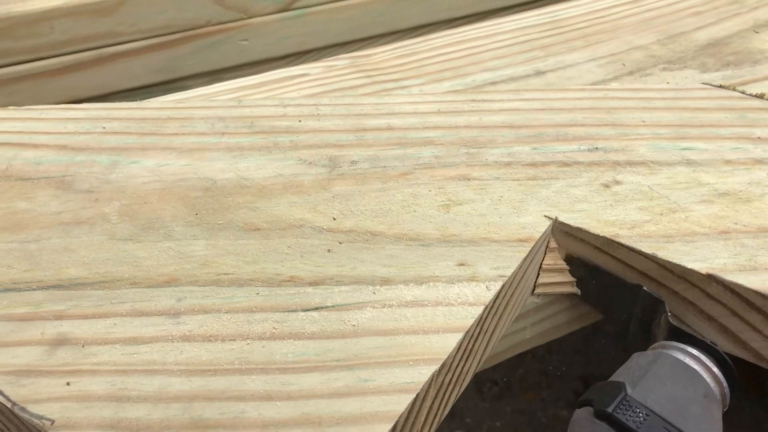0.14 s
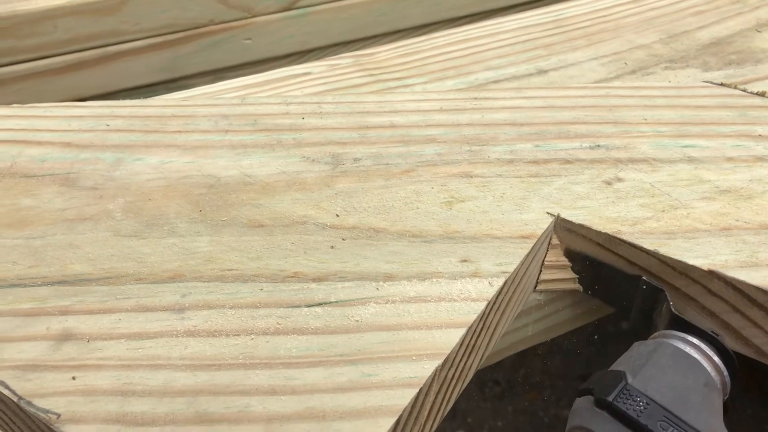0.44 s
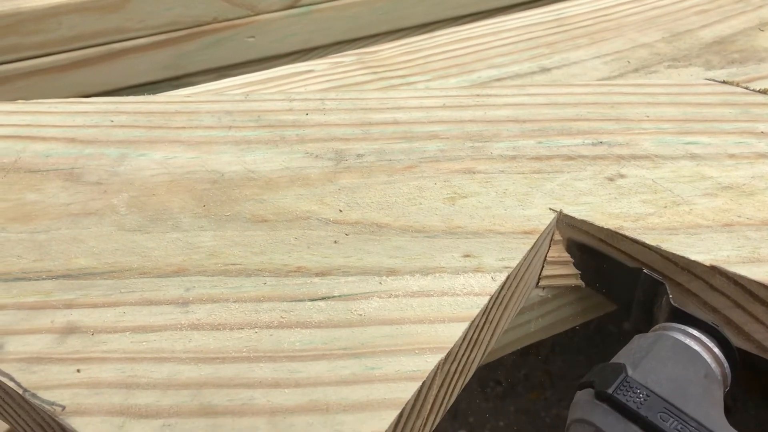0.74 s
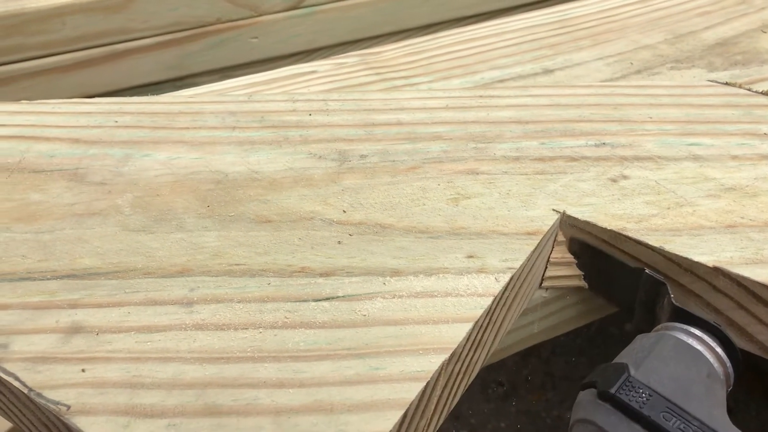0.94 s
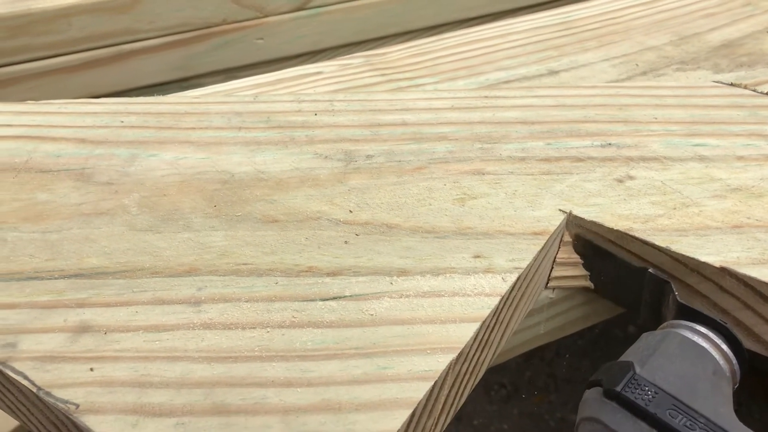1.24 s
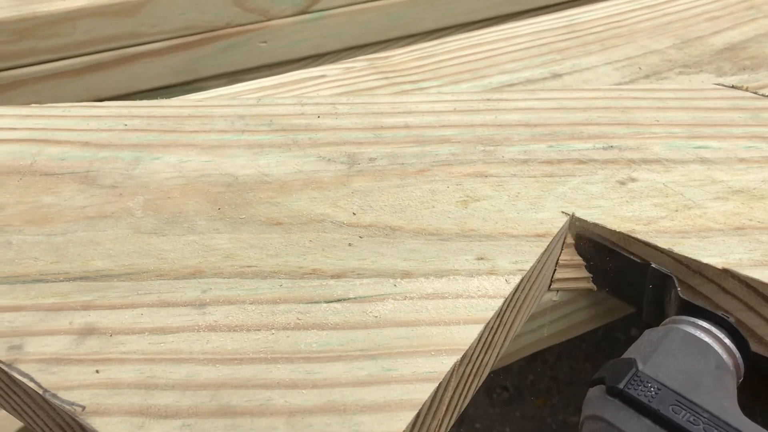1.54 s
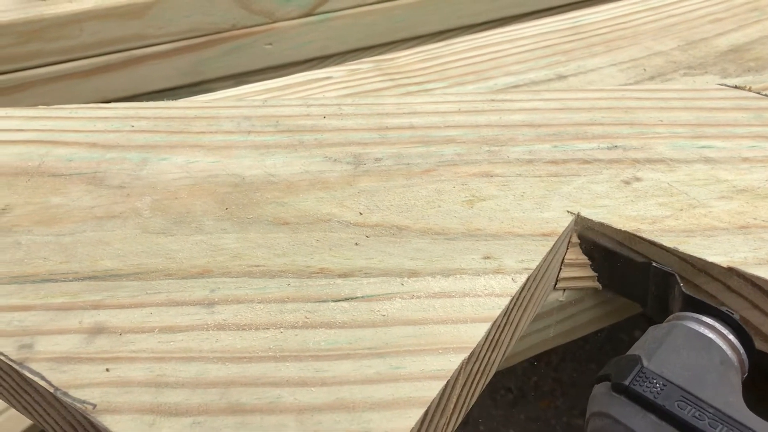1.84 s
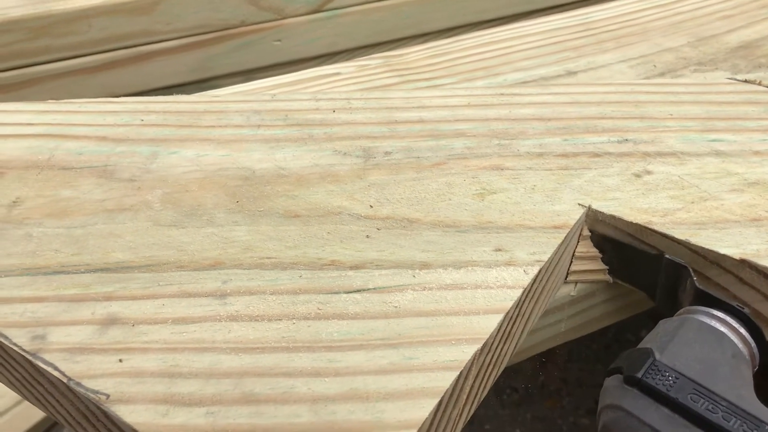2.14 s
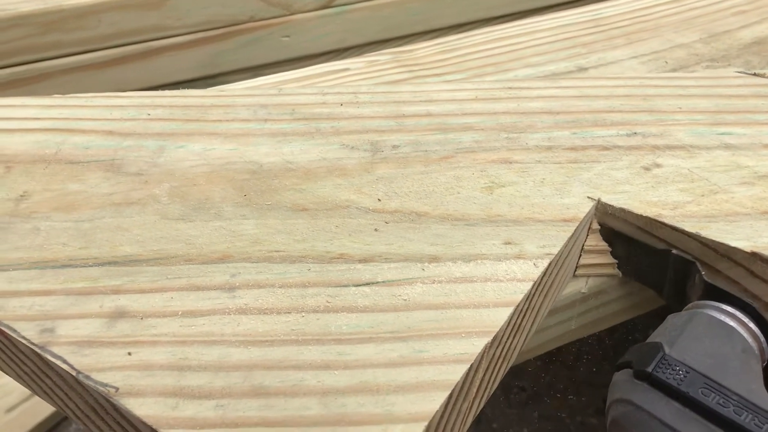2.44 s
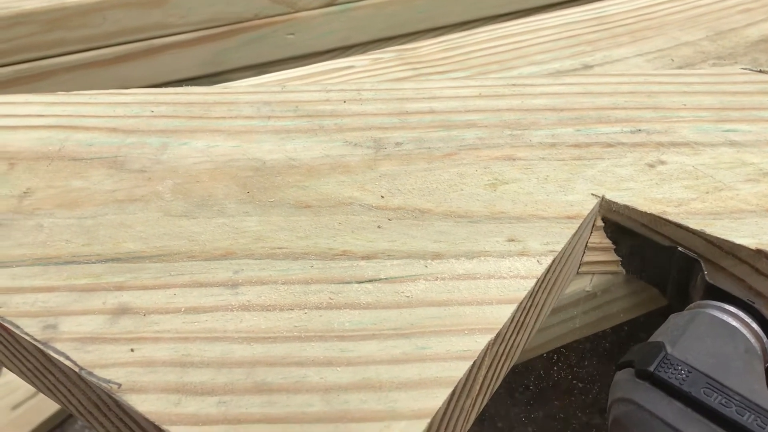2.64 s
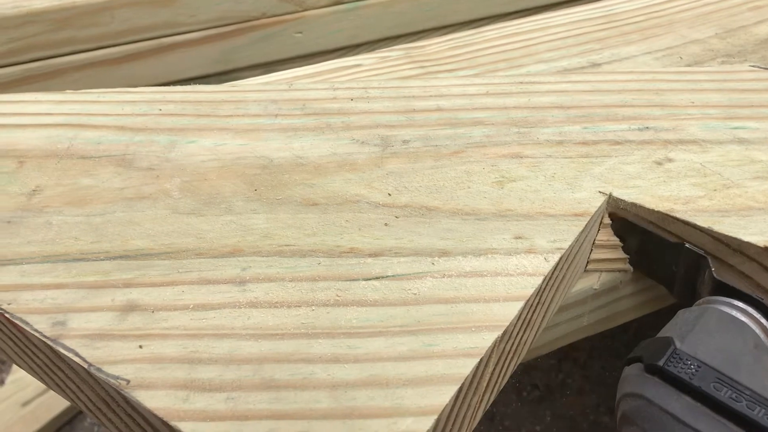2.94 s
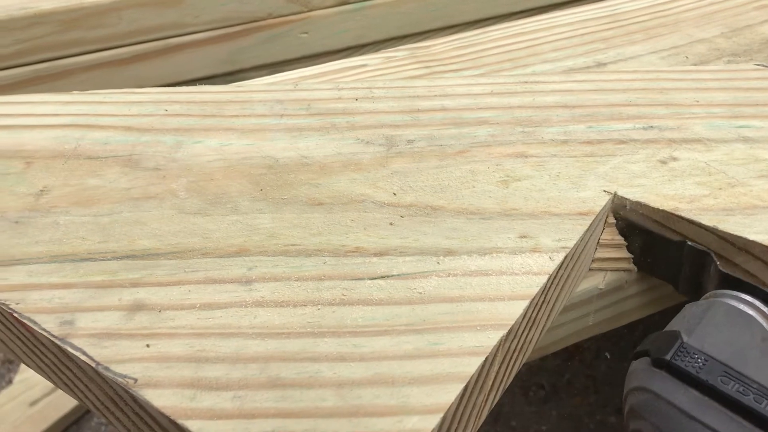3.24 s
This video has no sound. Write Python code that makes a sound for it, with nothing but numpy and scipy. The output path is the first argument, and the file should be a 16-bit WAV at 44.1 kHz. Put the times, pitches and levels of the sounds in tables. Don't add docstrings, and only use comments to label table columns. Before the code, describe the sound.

Harsh buzzing saw tool cutting a board, pitch sagging twice, nearly stalling before springing back

```python
import sys
import numpy as np
from scipy import signal
from scipy.fft import rfft, irfft
from scipy.io import wavfile
from scipy.ndimage import uniform_filter1d

SR = 44100
rng = np.random.default_rng(int(sys.argv[2]) if len(sys.argv) > 2 else 0)


def elevation(decibels):
    levels = np.asarray(decibels, float)
    return 10 ** (levels / 20)


def inscribe(sig):
    pcm = np.round(np.clip(np.atleast_2d(sig).T, -1, 1) * 32767)
    wavfile.write(sys.argv[1], SR, pcm.astype(np.int16))


N = 149940
T = np.arange(N) / SR


def curve(table, col):
    rows = np.array(table)
    return uniform_filter1d(np.interp(T, rows[:, 0], rows[:, col]), size=900, mode="nearest")


def bumps(rows):
    return sum(db * np.exp(-((T - s) / length) ** 2) for s, length, db in rows)


def colour(x, points, db):
    hz = np.maximum(np.arange(N // 2 + 1) * SR / N, 1)
    p = np.array(points)
    tilt_db = np.interp(np.log(hz), np.log(p[:, 0]), p[:, 1], left=-70)
    y = irfft(rfft(x) * elevation(tilt_db), N)
    return y * elevation(db) / np.sqrt(np.mean(y ** 2))


def walk(rate):
    k = int(SR / rate)
    steps = np.repeat(rng.standard_normal(400), k)[:N]
    w = uniform_filter1d(uniform_filter1d(steps, k), k)
    return w / w.std()


# (time [s], swing rate [Hz])
SPEED = [(0, 273.8), (.35, 269.1), (.97, 270.7), (1.005, 254), (1.06, 244.2), (1.18, 236.8), (1.25, 240.8),
         (1.31, 269.2), (1.8, 272.8), (2.17, 270.7), (2.23, 254.4), (2.47, 241.5), (2.57, 231.7),
         (2.71, 224.2), (2.96, 171), (3.06, 165.8), (3.12, 185.1), (3.21, 272.3)]


def swing_rate():
    return curve(SPEED, 1)


# (time [s], level [dB], bite steadiness [dB], wood rasp [dB], likeness of stroke ends [dB])
CONTACT = [(0, 1, -1, -9, -13), (.19, 2, -4, -3.5, -10), (.26, 0, -3, 3, 8), (.55, 1, -1, -8.5, -4),
           (.62, 1, -3.5, 0.5, -7.5), (.97, -0.5, 1.5, -7, -5.5), (1.05, -0.5, 1, -3.5, -3.5),
           (1.24, 1, 0, -5.5, -0.5), (1.34, 0.5, 1, -3.5, 1.5), (1.56, 0, 2, -11, 4),
           (1.66, 0.5, -1.5, 0.5, 6.5), (2.18, 0, -4.5, 3.5, 4), (2.3, 1.5, 1, 0, -7),
           (2.75, 0, -1, -4.5, 7.5), (2.92, -5.5, -5, 0, 1), (3.11, -2, -1, -4, 4.5),
           (3.175, 5, -0.5, 0.5, 4.5), (3.32, 0.5, -3, 4, -4)]


def contact(col):
    return curve(CONTACT, col)


# (time [s], length [s], gain [dB])
CATCHES = [
    (.15, 0.037, 2),
    (.99, 0.022, 2.5),
    (1.125, 0.015, 6),
    (1.285, 0.036, 5),
    (1.53, 0.021, 0),
    (2.13, .02, 7),
    (2.38, 0.032, 3.5),
    (3.18, 0.0068, 4.5),
]


def catches():
    return bumps(CATCHES)


def depth():
    return np.clip((T - 1.18) / 0.15, 0, 1)


# (time [s], length [s], centre [Hz], width [Hz], gain [dB])
RESONANCES = [(0.11, 0.12, 1260, 82, 3), (.12, .1, 2950, 350, 3.5), (.07, 0.073, 2170, 170, -14),
              (0.13, 0.15, 5450, 300, -3), (0.365, 0.081, 1450, 400, -15), (0.31, 0.043, 2950, 450, -5),
              (0.61, 0.077, 1800, 300, -1.5), (0.43, 0.13, 2380, 230, 8), (0.68, .15, 1300, 400, 1.5),
              (.75, 0.23, 1770, 180, 3), (0.78, 0.19, 2700, 260, -6), (1.2, 0.074, 1400, 140, 4.5),
              (1.34, 0.071, 3730, 440, -5), (.995, 0.02, 3760, 1600, 5), (1.262, 0.03, 4500, 610, 5.5),
              (1.55, 0.043, 3620, 560, 4), (1.55, .05, 5330, 350, 4), (1.741, 0.19, 2450, 170, 9.5),
              (1.97, 0.28, 3800, 180, -6), (1.76, .12, 3530, 200, 4), (2.4, 0.15, 1720, 180, 6.5),
              (2.44, 0.15, 1064, 167, 5.5), (2.603, 0.084, 2250, 170, 14.5), (2.6, 0.06, 2100, 250, -4),
              (2, 0.062, 2900, 700, -9), (2.77, 0.049, 1680, 130, 10.5), (3.04, 0.035, 970, 870, -0.5),
              (3.125, 0.046, 1900, 1740, -5), (3.33, 0.11, 806, 140, -7), (2.91, 0.046, 1600, 1400, -5),
              (3.26, 0.052, 1330, 230, 5), (3.25, 0.049, 2080, 270, 5)]


def resonance(hz):
    t, f = T[::200], hz[::200]
    db = 0
    for s, length, mid_hz, width, gain_db in RESONANCES:
        db = db + gain_db * np.exp(-((t - s) / length) ** 2 - ((f - mid_hz) / width) ** 4)
    return np.interp(T, t, db)


# (multiple of swing rate, level [dB])
FREE = [(1, -19), (2, -17.5), (3, -3.5), (4, -10), (5, -10), (6, -3), (7, -4.5), (8, -10), (9, -12),
        (10, -10), (11, -9), (12, -8.5), (13, -5.5), (14, -1), (15, -6.5), (16, -5), (17, -3.5), (18, -17),
        (19, -18), (20, -3), (21, -19), (22, -9), (23, -11)]
# (multiple of swing rate, level [dB])
DEEP = [(1, -21), (2, -17), (3, -1.5), (4, -9), (5, -9), (6, -6), (7, -10), (8, -5), (9, -15.5), (10, -14),
        (11, -7), (12, -12), (13, -8), (14, -2), (15, -3.5), (16, -6), (17, -8), (18, -7), (19, -9),
        (20, -12), (21, -27), (22, -10.5), (23, -10.5)]
# (multiple of swing rate, level [dB])
LOADED = [(1, -20.5), (2, -14), (3, -8), (4, -8), (5, -4), (6, -6), (7, -9), (8, -10), (9, -11),
          (10, -14.5), (11, -15), (12, -31), (13, -10), (14, -20), (15, -12), (16, -8), (17, -10),
          (18, -8.5), (19, -8), (20, -15), (21, -29), (22, -24), (23, -8)]
# (multiple of swing rate, level [dB])
STALLED = [(1, -10), (2, -15), (3, -8.5), (4, -6), (5, 1.5), (6, 2.5), (7, 5), (8, -1), (9, 3), (10, 0),
           (11, 3.5), (12, -13), (13, -1), (14, -2.5), (15, -26.5), (16, 0.5), (17, -20), (18, -5),
           (19, -26), (20, -5), (21, -6), (22, -4), (23, -10)]
# (time [s], length [s], gain [dB])
STILLS = [
    (2.73, 0.051, -32),
    (3.07, 0.029, -26),
    (3.3, 0.098, -6),
]


def hum(turns, hz):
    free_hz, loaded_hz, stalled_hz = 270.6, 251.5, 178
    stall_from_hz = loaded_hz - 20
    load = np.clip((free_hz - hz) / (free_hz - loaded_hz), 0, 1)
    stall = np.clip((stall_from_hz - hz) / (stall_from_hz - stalled_hz), 0, 1)
    glide = np.abs(np.gradient(hz)) * SR
    slip = (.004 + 1e-5 * glide) * walk(80)
    alike, bite = contact(4), contact(2) + catches()
    still, deep = bumps(STILLS), depth()
    flutter_depth = 0.42 + 0.47 * load + 0.49 * stall
    out = 0
    for (k, shallow_db), (_, deep_db), (_, loaded_db), (_, stalled_db) in zip(FREE, DEEP, LOADED, STALLED):
        free_db = shallow_db + deep * (deep_db - shallow_db)
        db = free_db + load * (loaded_db - free_db) + stall * (stalled_db - loaded_db)
        db = db + bite * min((k - 1) / 4.5, 1.3)
        db = db + 1.8 * np.tanh(walk(10))
        db = db - flutter_depth * min(k / 3.8, 1) * 3.5 * walk(40) ** 2
        push = load * (np.arange(N) < 1.3 * SR) * (3 <= k <= 6)
        db = db + push * (-4.5 - 0.24 * bite.std() * walk(26.6))
        db = db + resonance(k * hz) + alike * (k == 2) + still * (k == 1)
        drift = 0.048 * k * rng.standard_normal() + 0.063 * walk(6.2)
        out = out + elevation(db) * np.sin(2 * np.pi * (k * (turns + slip) + drift))
    return out * elevation(-30) * np.sqrt(2)


def rasp(turns, points, db, both_db, one_db, grit_db, flicker_db):
    angle = 2 * np.pi * (turns + 0.088 * walk(5.25))
    gate_db = both_db * np.cos(2 * angle) + one_db * (1 + .5 * walk(3.92)) * np.cos(angle)
    size_db = np.minimum(grit_db * rng.exponential(size=N), 13)
    chips = rng.standard_normal(N) * elevation(gate_db + size_db)
    return colour(chips, points, db) * elevation(flicker_db * (walk(29.95) + walk(7.97)))


# (time [s], length [s], gain [dB])
HUSHES = [
    (.13, 0.091, -2),
    (.9, 0.083, 1.5),
    (1.06, 0.03, 0),
    (1.38, .015, -1.5),
    (1.52, 0.014, -4),
    (1.56, .03, 2.5),
    (3.04, .04, -0.5),
]


def hushes():
    return bumps(HUSHES)


# (frequency [Hz], density [dB per Hz])
WOOD = [(300, -33), (500, -19), (750, -16.5), (1100, -4.5), (1700, -6), (2600, -7.5), (3300, -6.5),
        (6000, -17.5)]


def wood_rasp(turns):
    return rasp(turns, WOOD, -30.5, 3., 2., 2.5, 1.2) * elevation(contact(3) - .6 * catches())


# (frequency [Hz], density [dB per Hz])
BLADE = [(1500, -4), (2700, -10), (4000, 0.5), (5500, -1.5), (7000, -7), (8800, -7), (10300, -15),
         (11500, -13)]


def blade_rasp(turns):
    return rasp(turns - .15, BLADE, -25, 1.7, 1.0, 2.7, 0.3) * elevation(-.4 * (contact(2) + catches()))


# (frequency [Hz], density [dB per Hz])
BOARD = [(120, -27), (250, -2.5), (400, -8), (600, -3), (800, 2), (1200, -20.5)]


def board_rasp(turns):
    return rasp(turns, BOARD, -51, 1., 1., 2., 1.5) * elevation(1.1 * contact(3) + 2 * hushes())


# (frequency [Hz], density [dB per Hz])
TEETH = [(9000, -65), (10500, -5), (11500, 3), (12600, 11), (13200, 4.5), (13800, 6), (15000, 0.5),
         (16500, -29.5)]


def teeth_hiss(turns):
    return rasp(turns - .25, TEETH, -29.5, 3.5, 1.6, 2.3, .9)


# (centre [Hz], width [Hz], level [dB], gain once deep [dB], gain once cut free [dB])
RINGS = [(4360, 750, -32.5, -2, 2), (5620, 530, -33.5, -4, -1), (8930, 1080, -35.5, 1, -3.5),
         (11970, 910, -42.5, 5, 4), (14350, 500, -33.5, -1, -1)]
# (time [s], length [s], ringing near [Hz], gain [dB])
SWELLS = [
    (0.124, 0.15, 5620, -5),
    (.6, 0.075, 5620, 2),
    (.85, 0.076, 5620, 4),
    (.42, .08, 4360, 0),
    (.9, 0.073, 4360, 2),
    (1.637, .04, 4360, 5),
    (2.4, 0.092, 4360, -9),
    (3.273, .03, 4360, 3),
]


def rings(turns):
    freed = np.clip((T - 3.14) / 0.035, 0, 1)
    out = 0
    for hz, w, db, deep_db, freed_db in RINGS:
        peak = [(hz - 2 * w, -24), (hz - w / 2, -3), (hz, 0), (hz + w / 2, -3),
                (hz + 2 * w, -24), (hz + 3 * w, -70)]
        swell = bumps([(s, length, gain) for s, length, near_hz, gain in SWELLS if abs(near_hz - hz) < w])
        ring = rasp(turns - .2, peak, db, 1.8, 2.6, 1.6, 1.4)
        out = out + ring * elevation(deep_db * depth() + freed_db * freed + swell)
    return out


# (frequency [Hz], density [dB per Hz])
WIND = [(20, -18), (35, -26), (55, 1), (90, -9.5), (160, -10), (300, -14), (600, -49)]


def wind():
    db = 2.3 * walk(6.07) + 1.2 * walk(29)
    db = db + 2.5 * (T - 2)
    db = db + bumps([(3.21, 0.097, 9.5)])
    return colour(rng.standard_normal(N), WIND, -61) * elevation(db)


# (time [s], low edge [Hz], high edge [Hz])
FLIPS = [
    (.499, 5100, 6500),
    (.94, 8900, 11200),
    (1.451, 11800, 14600),
]


def flips(x):
    early = np.roll(x, 1630)
    out = 0
    for s, lo_hz, hi_hz in FLIPS:
        band = signal.butter(6, [lo_hz, hi_hz], "band", fs=SR, output="sos")
        shape = 0.66 * np.exp(-((T - s) / 0.013) ** 4)
        out = out + shape * signal.sosfiltfilt(band, early)
    return out


# (time [s], level [dB], nominal pitch [Hz], the fall starts at nearly twice this)
KNOCKS = [
    (1.61, -40, 170),
    (3.347, -28, 230),
]


def knocks():
    t60_s, sag, attack_s, fall_s = 0.076, 0.84, 0.0033, 0.0075
    out = 0
    for s, db, hz in KNOCKS:
        u = np.maximum(T - s, 0)
        envelope = np.exp(-np.log(1000) * u / t60_s) * (1 - np.exp(-u / attack_s))
        bent_time = u * (1 - sag) + sag * 0.0157 * (1 - np.exp(-u / fall_s))
        out = out + elevation(db) * envelope * np.sin(2 * np.pi * hz * bent_time)
    return out


def bounce(turns):
    shape = np.exp(-((T - 2.9) / 0.073) ** 4)
    lines = sum(elevation(3.5 * walk(40)) * np.sin(np.pi * k * turns) for k in range(7, 17, 2))
    return elevation(-36.5) * shape * lines


def scene():
    hz = swing_rate()
    turns = np.cumsum(hz) / SR
    scraping = (wood_rasp(turns) + rings(turns) + blade_rasp(turns)) * elevation(hushes())
    tool = hum(turns, hz) + bounce(turns) + board_rasp(turns) + scraping + teeth_hiss(turns)
    mono = tool * elevation(contact(1)) + knocks() + wind()
    return mono + np.outer([1, -1], flips(mono))


def band_limit(x):
    return signal.sosfilt(signal.butter(12, 17010, fs=SR, output="sos"), x)


def record(dry):
    ceiling, top_hz = 0.77, 15700
    rounded = ceiling * np.tanh(dry / ceiling)
    lowpass = signal.ellip(10, .1, 60, top_hz, fs=SR, output="sos")
    mix = signal.sosfiltfilt(lowpass, rounded)
    return band_limit(mix)


dry = scene()
out = record(dry)
inscribe(out)
```